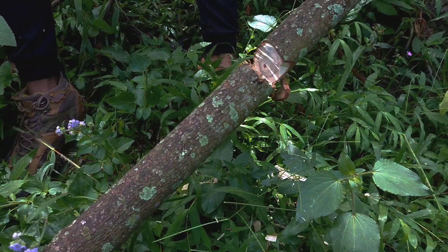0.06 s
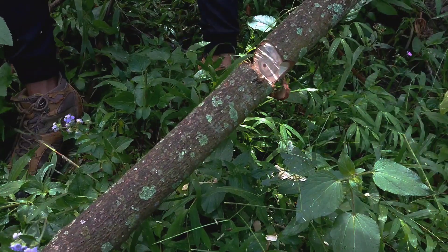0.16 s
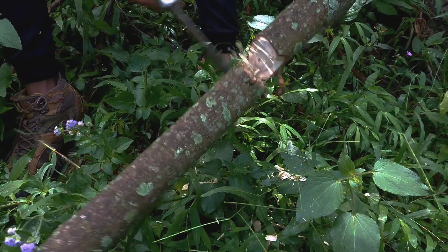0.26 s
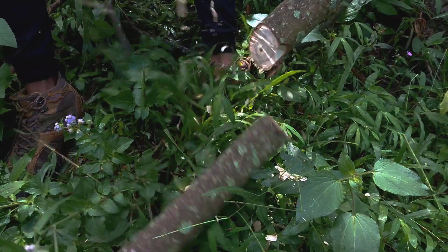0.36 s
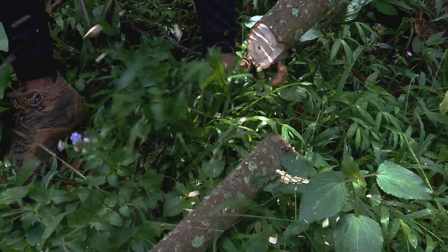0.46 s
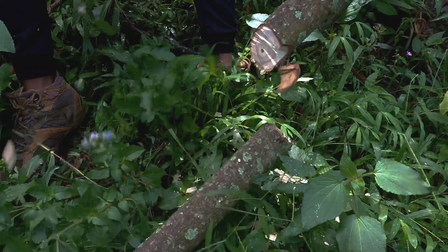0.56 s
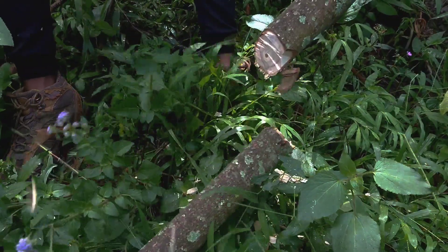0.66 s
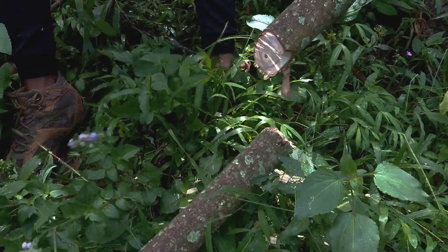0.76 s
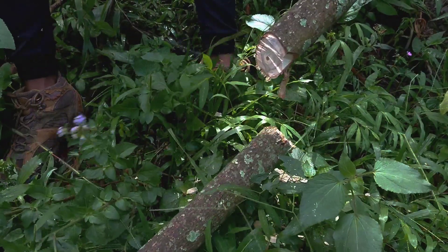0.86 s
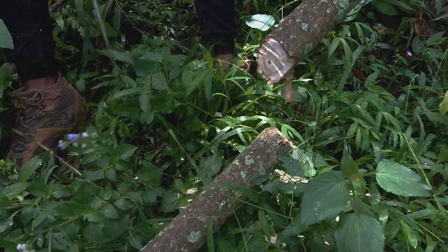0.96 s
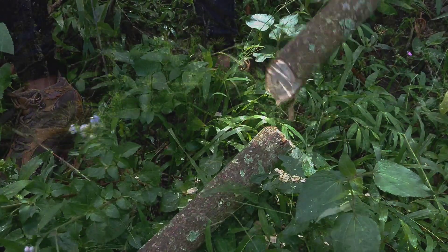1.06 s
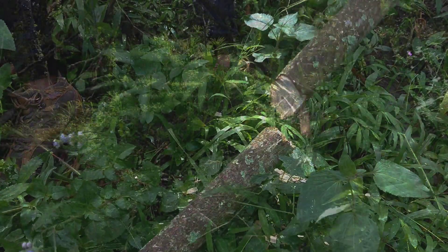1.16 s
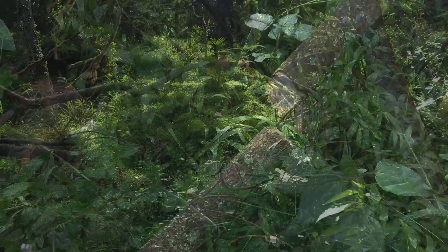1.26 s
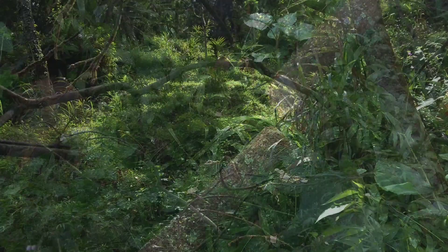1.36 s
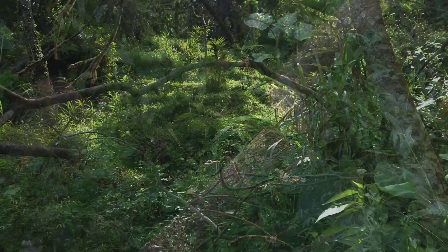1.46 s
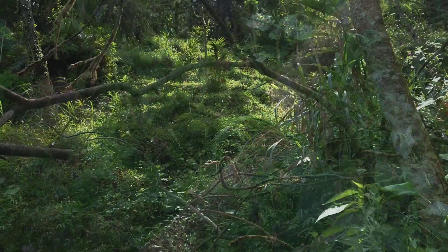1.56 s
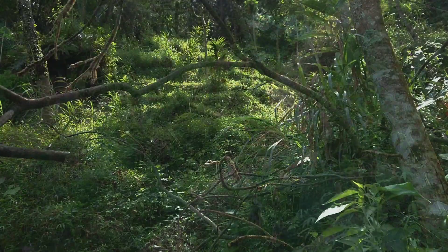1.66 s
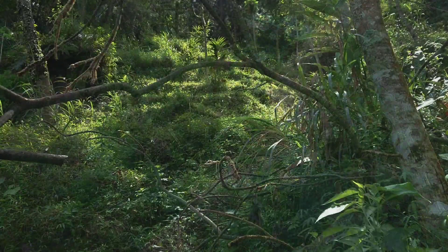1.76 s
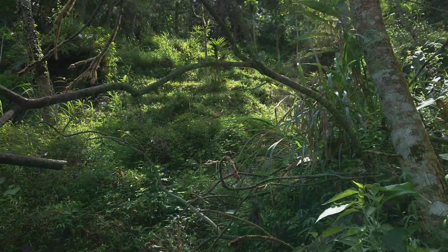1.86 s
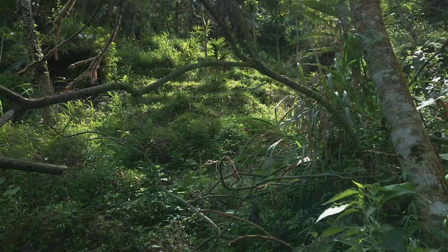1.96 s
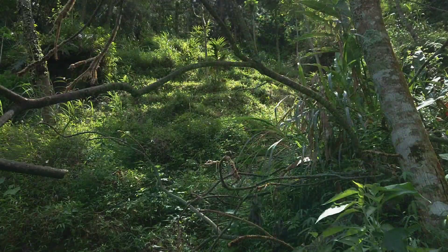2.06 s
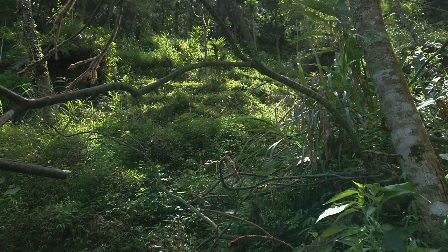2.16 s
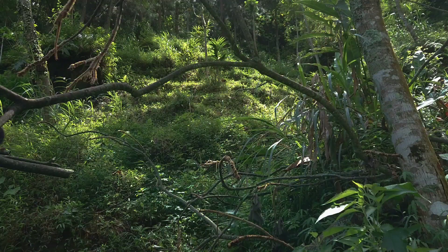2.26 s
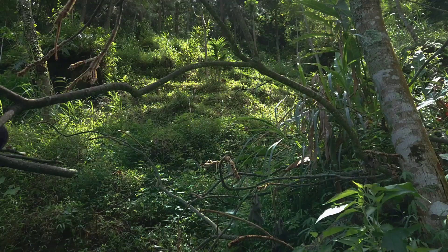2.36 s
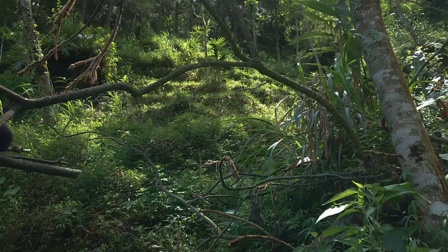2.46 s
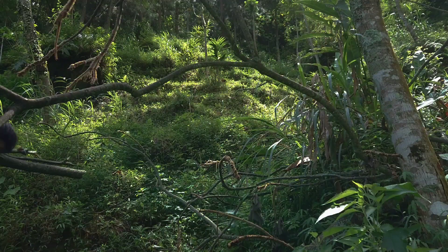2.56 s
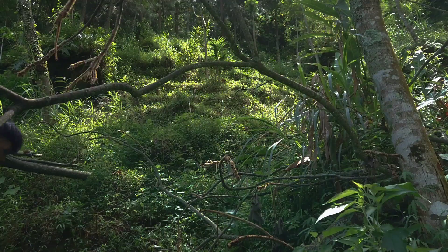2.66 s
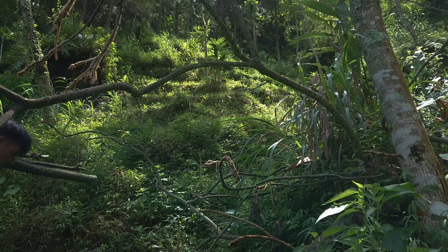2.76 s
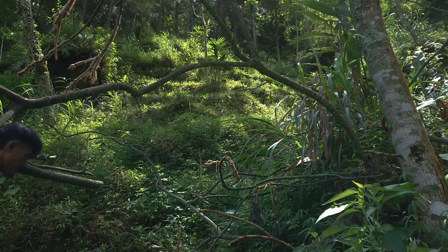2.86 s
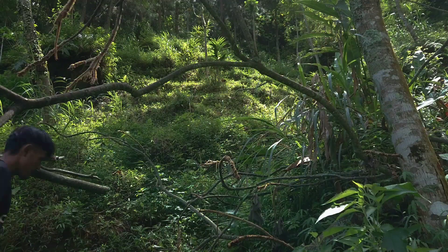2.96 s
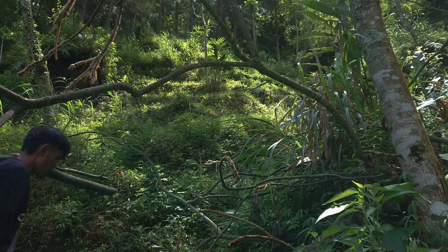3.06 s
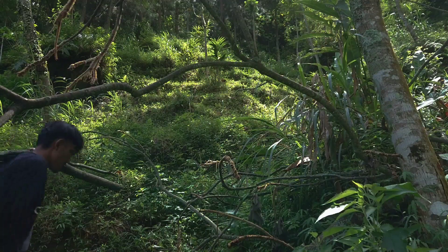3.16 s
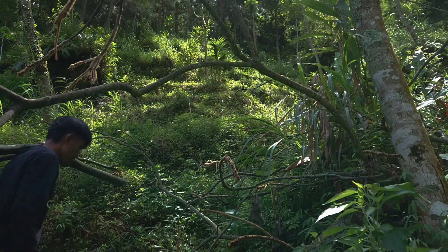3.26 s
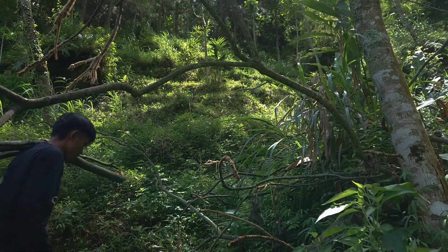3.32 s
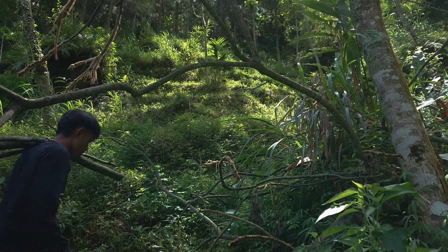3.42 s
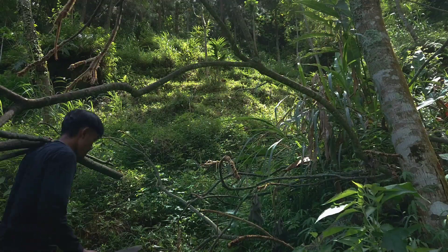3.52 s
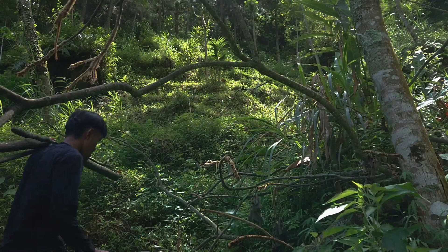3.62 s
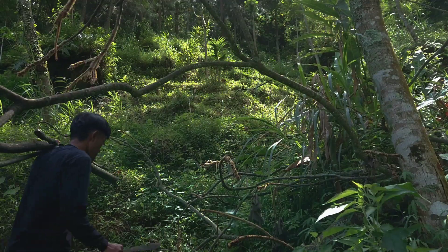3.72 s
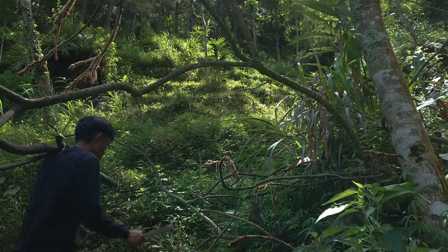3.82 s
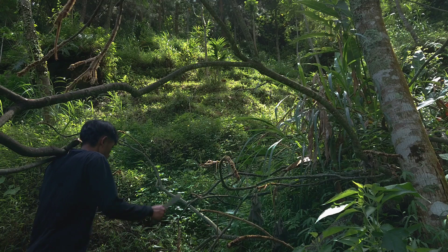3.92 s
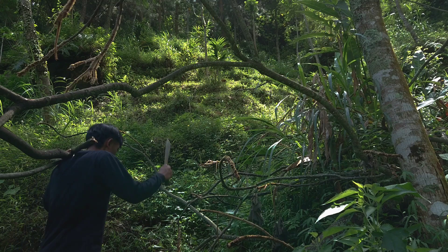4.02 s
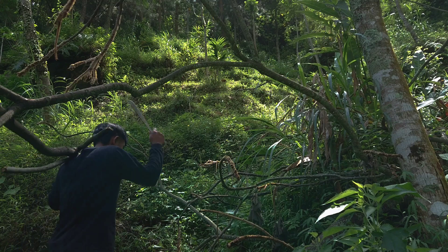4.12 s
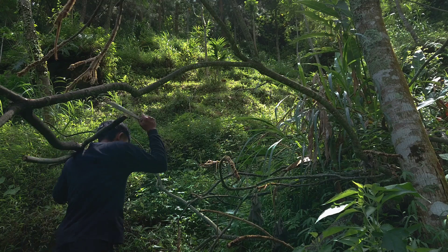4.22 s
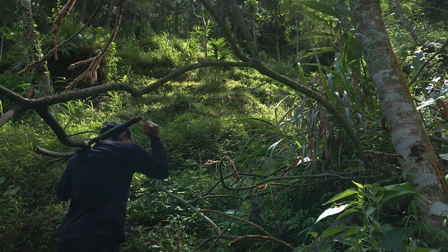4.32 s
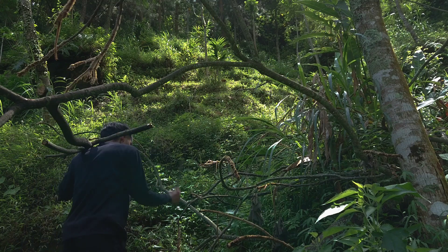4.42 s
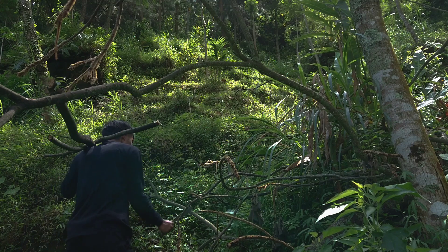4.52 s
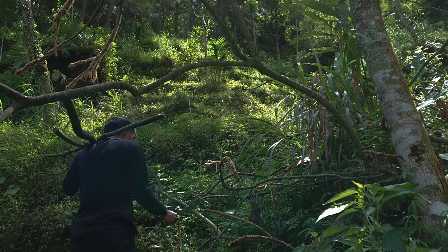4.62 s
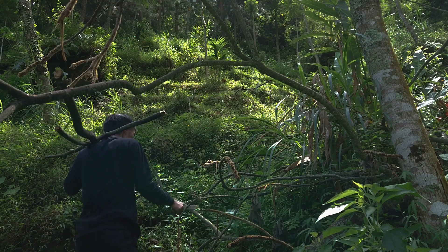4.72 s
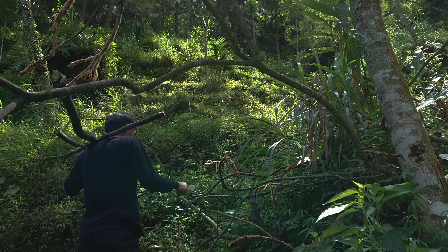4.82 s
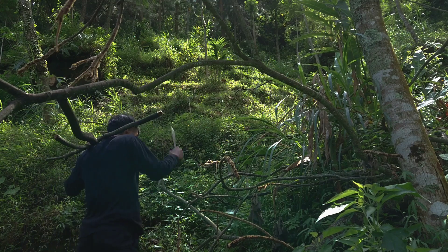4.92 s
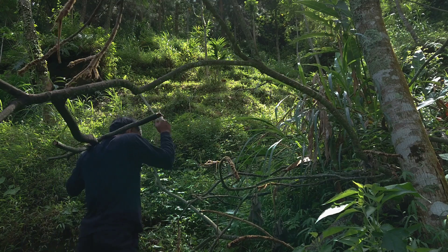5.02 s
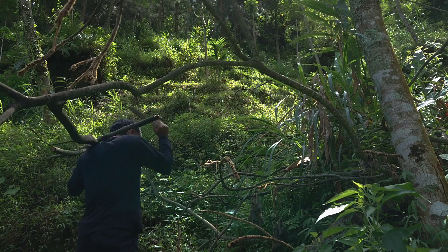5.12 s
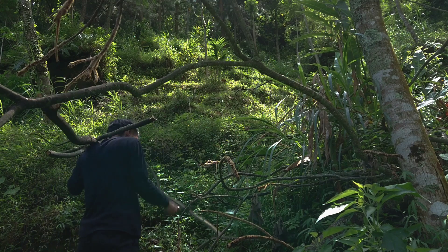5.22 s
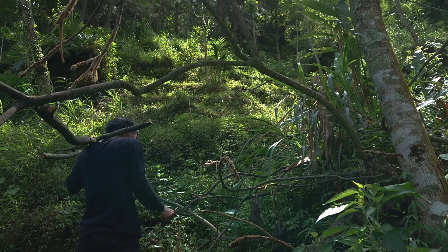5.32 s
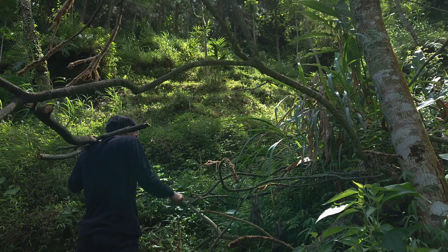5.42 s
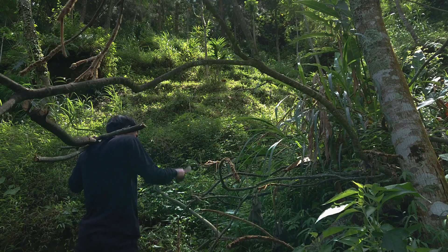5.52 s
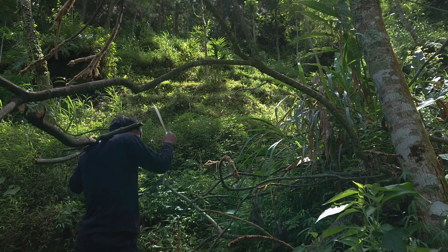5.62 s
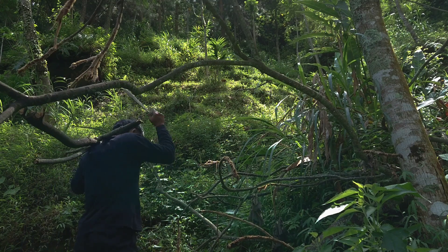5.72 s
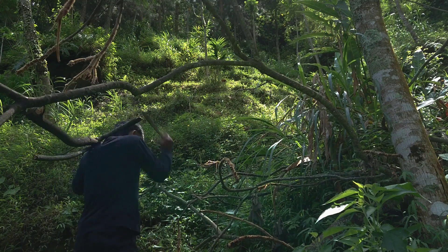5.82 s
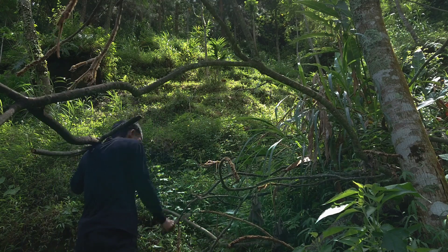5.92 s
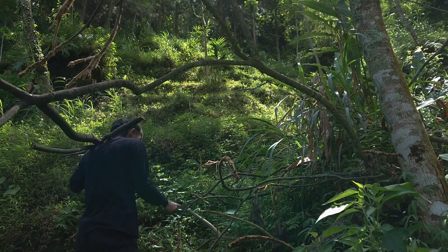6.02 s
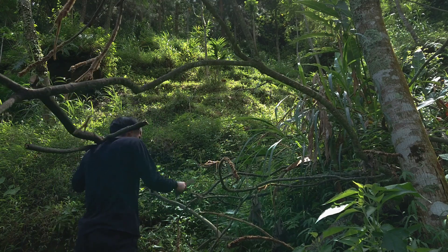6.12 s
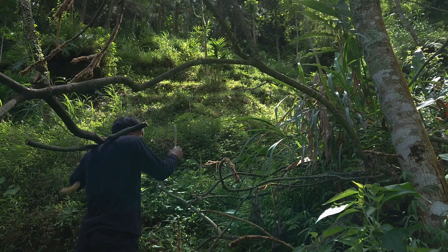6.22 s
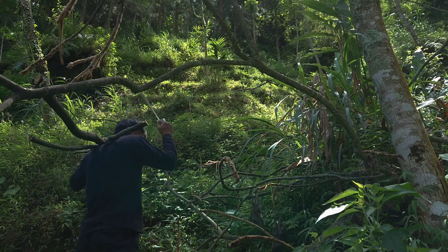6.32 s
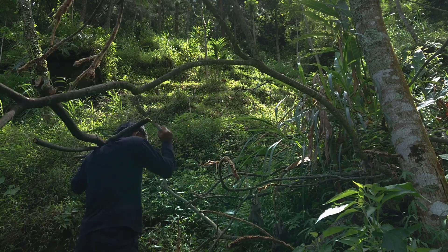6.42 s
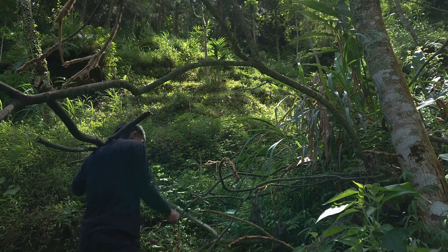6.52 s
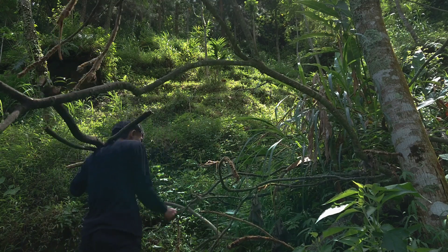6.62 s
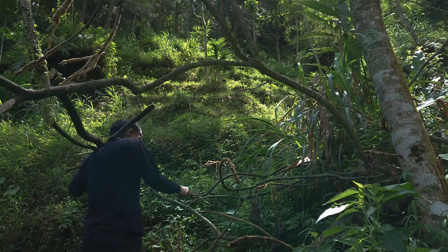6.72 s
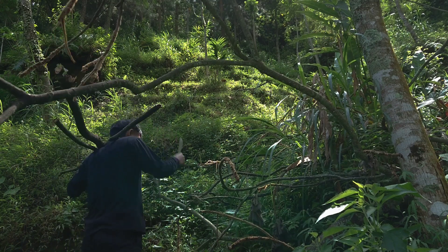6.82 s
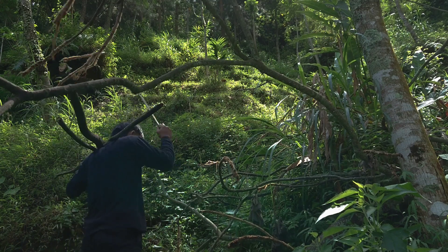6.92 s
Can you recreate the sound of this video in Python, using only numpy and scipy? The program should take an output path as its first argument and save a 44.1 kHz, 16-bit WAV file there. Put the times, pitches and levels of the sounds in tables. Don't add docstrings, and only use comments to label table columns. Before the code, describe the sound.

Quiet undergrowth with soft low rumble and thin hiss. From 0.1 s a very faint, distant rooster calls in four notes, the last long and falling, ending about 1.2 s. At 0.4 s a blade hits a green trunk very close: a loud, sharp, splintering crack, short wood ring, leaves swishing and settling. Small twig ticks come near 0.9 and 1.05 s, and a tiny falling bird chirp at 1.47 s. The air sinks and at 1.7 s a second forest enters, rising until 2.5 s: bright continuous cicadas, slightly left, sagging briefly every second or so, with a low receding engine hum and rumble. Soft brushing and a dull step occur around 3.4 s, another brush at 3.9 s. Four chops into a branch, farther and quieter, fall at 4.6, 5.4, 6.1 and 6.7 s, each a dry crack, hollow knock, low thump and leaf rustle; the rumble swells at the last.

```python
import sys
import numpy as np
from scipy import signal
from scipy.io import wavfile
from scipy.ndimage import uniform_filter1d

SR = 44100
rng = np.random.default_rng(int(sys.argv[2]) if len(sys.argv) > 2 else 0)


def pcm_store(signal):
    levels = np.round(np.clip(np.atleast_2d(signal), -1, 1) * 32767)
    wavfile.write(sys.argv[1], SR, levels.astype(np.int16).T)


def undo_db(level):
    steps = np.asarray(level, float) / 20
    return 10 ** steps


N = 307818


def evened(x):
    return x / np.sqrt(np.mean(x ** 2) + 1e-20)


def read(points, hz):
    f, value = np.transpose(points)
    return np.interp(np.log(hz + 1), np.log(f + 1), value)


def curve(rows, column=1):
    rows = np.array(rows)
    return np.interp(np.arange(N) / SR, rows[:, 0], rows[:, column])


def add(mix, s, sound):
    part = mix[:, round(s * SR):][:, :sound.shape[1]]
    part += sound[:, :part.shape[1]]


def ring(x, hz, width_hz):
    r = np.exp(-np.pi * width_hz / SR)
    w = 2 * np.pi * min(hz, SR / 2.2) / SR
    return signal.lfilter([np.sin(w)], [1, -2 * r * np.cos(w), r * r], x)


def glide(x, hz, width_hz):
    turn = np.exp(2j * np.pi * np.cumsum(hz) / SR)
    r = np.exp(-np.pi * width_hz / SR)
    return evened((turn * signal.lfilter([1], [1, -2 * r, r * r], x / turn)).real)


def pair(count, same):
    a, b = rng.standard_normal((count, 2)).T
    same = np.clip(same, 0, 1)
    return np.array([a, same * a + np.sqrt(1 - same ** 2) * b])


def bed(spectrum, likeness, patchy_db, flicker_db, left_lead=0, left_db=0):
    frames, hz = N // 256 + 5, np.fft.rfftfreq(1024, 1 / SR)
    a, b, c, d, patches = rng.standard_normal((frames, 513, 5)).T
    patches = uniform_filter1d(patches, size=8, axis=0)
    patches = evened(uniform_filter1d(patches, size=10, axis=1))
    flicker = evened(uniform_filter1d(rng.standard_normal(frames), size=3))
    same = np.clip(read(likeness, hz), 0, 1)[:, None]
    left, other = a + 1j * b, c + 1j * d
    late = np.exp(-2j * np.pi * hz * left_lead / SR)[:, None]
    z = np.array([left * undo_db(left_db), same * left * late + np.sqrt(1 - same ** 2) * other])
    colour_db = np.where(hz > spectrum[-1][0], -120, read(spectrum, hz))
    z *= undo_db(colour_db[:, None] + patchy_db * patches + flicker_db * flicker)
    return evened(signal.istft(z, nperseg=1024, noverlap=768)[1][:, :N])


# frequency in Hz, likeness 0-1.
DIFFUSE = [(60, .95), (200, 0.93), (380, .75), (700, 0.053), (1300, 0.033), (16000, .03)]
# frequency in Hz, level in dB per Hz.
NEAR_AIR = [(15, -57), (25, -30), (53, -3.5), (130, -4.5), (166, -11.5), (256, -14), (607, -23.5),
            (677, -22), (734, -23.5), (1370, -28.5), (1520, -32.5), (5000, -35), (7310, -47),
            (16000, -39.5)]
NEAR_RUMBLE_DB, NEAR_HISS_DB = -55.5, -62.5
FAR_START_S = 1.699
FADE_OUT_S, FADE_OUT_LEFT = 0.93, 0.37
DUCK_S, DUCK_DB, DUCK_WIDTH_S = .56, -3, 0.078


def first_scene():
    t = np.arange(N) / SR
    low = [p for p in NEAR_AIR if p[0] < 450] + [(600, -22.5)]
    high = [(250, -41.5)] + [p for p in NEAR_AIR if p[0] >= 450]
    rumble = undo_db(NEAR_RUMBLE_DB) * bed(low, DIFFUSE, patchy_db=1.5, flicker_db=-1.8, left_db=1.4)
    hiss = undo_db(NEAR_HISS_DB) * bed(high, DIFFUSE, patchy_db=1.3, flicker_db=1.4, left_db=0.5)
    fade = curve([(FADE_OUT_S, 1), (FAR_START_S, FADE_OUT_LEFT)])
    duck = undo_db(DUCK_DB * np.exp(-((t - DUCK_S) / DUCK_WIDTH_S) ** 2))
    return (rumble + hiss) * fade * duck * (np.arange(N) < FAR_START_S * SR)


# start in seconds, length in seconds, pitch in Hz, end pitch in Hz,
# 2nd partial in dB.
ROOSTER = [
    (0.098, .11, 684, 690, -73.5),
    (.22, 0.21, 690, 686, -69),
    (0.622, 0.21, 701, 687, -74.5),
    (0.852, .36, 688, 622, -68),
]
CROW_EDGE_S, CROW_FADE_DB, CROW_LOW_DB = 0.017, -16.5, -1


def rooster():
    out = np.zeros((2, N))
    for s, length_s, hz, end_hz, db in ROOSTER:
        t = np.arange(0, length_s, 1 / SR)
        turns = np.cumsum(hz + (end_hz - hz) * (t / length_s) ** 2) / SR
        edges = np.clip(np.minimum(t, length_s - t) / CROW_EDGE_S, 0, 1)
        level = edges * undo_db(db + CROW_FADE_DB * (hz - end_hz) / 100 * t / length_s)
        voice = np.sin(4 * np.pi * turns) + undo_db(CROW_LOW_DB) * np.sin(2 * np.pi * turns)
        add(out, s, level * voice * np.ones((2, 1)))
    return np.sqrt(2) * out


# start in seconds, crack in dB, wood ring in dB, ground thump in dB, crack decay factor.
CHOPS = [
    (0.3983, -6.5, -25, -57, 0.71),
    (4.6242, -20, -18, -40.5, 0.66),
    (5.4029, -18, -25.5, -40.5, 0.85),
    (6.076, -18.5, -27.5, -42.5, 1.03),
    (6.699, -20, -24.5, -41, 0.82),
]
# frequency in Hz, level in dB per Hz.
CRACK_1 = [(180, -33), (300, -23.5), (1170, -4), (3290, -2.5), (7320, -15), (8500, -20.5), (9090, -21),
           (12100, -11.5), (14700, -18.5), (16000, -36.5)]
CRACK_2 = [(180, -36), (400, -7), (1560, 8), (2360, 9.5), (4990, -7), (5900, -5), (7690, -19),
           (11500, -13.5), (15000, -20), (16000, -54.5)]
CRACK_3 = [(180, -39), (300, -7.5), (994, -15), (2140, 6.5), (3080, -17), (3580, -1.5), (6000, -12.5),
           (7440, -28.5), (10700, -14.5), (16000, -38)]
CRACK_4 = [(180, -19), (300, -10.5), (978, -2), (1930, -0.5), (4300, -9.5), (5340, -13), (6000, -4),
           (7820, -18.5), (11700, -12), (16000, -39.5)]
CRACK_5 = [(180, -46), (400, -15), (1450, 0.5), (2000, -1), (3760, -9.5), (4830, -8), (6410, -21),
           (7200, -31), (11500, -16.5), (16000, -43)]
# frequency in Hz, T60 in seconds.
CRACK_T60 = [(300, 0.27), (1000, 0.041), (2500, 0.027), (6000, 0.033), (15000, 0.034)]
# frequency in Hz, level in dB, T60 in seconds.
WOOD_1 = [(165, -2.5, 0.11), (446.3, 0.5, 0.14), (730, 0.5, 0.086), (1265, -1, 0.04), (1850, -6, .035),
          (2010, -6.5, 0.03)]
WOOD_2 = [(344, -7, 0.16), (446, -17.5, 0.18), (537, -3, 0.09), (776, -5.5, 0.17), (937, -3, 0.088),
          (1406, -4, 0.072)]
WOOD_3 = [(355.3, -0.5, 0.21), (464, 2, 0.084), (620, -2.5, 0.048), (786, -5, 0.27), (947, -0.5, 0.088),
          (1400, 1.5, 0.031)]
WOOD_4 = [(350, 1, 0.16), (630, -16, 0.14), (805, 6.5, 0.15), (970, 3, 0.069), (1110, -28, 0.059),
          (1850, -17, .05)]
WOOD_5 = [(330, -7, 0.05), (512, -8.5, 0.2), (798, 4.5, 0.1), (956, 1.5, 0.077), (1183, 6.5, 0.027),
          (1470, 8.5, 0.036)]
CRACKS = (CRACK_1, CRACK_2, CRACK_3, CRACK_4, CRACK_5)
WOODS = (WOOD_1, WOOD_2, WOOD_3, WOOD_4, WOOD_5)
NEAR_LEAD_SAMPLES, FAR_LEAD_SAMPLES = 0, 7
NEAR_SAME, FAR_SAME = .15, .55
CRACK_HOLD_S, CRACK_RISE_S = .0016, .0011
BITE_S = .0019
LIMB_HZ, LIMB_DB, LIMB_RISE_S = 154.5, 0, 0.012


def fibre_crack(t, same, colour, crack_db, slow):
    spikes = undo_db(2.4 * np.minimum(rng.exponential(1, len(t)), 4))
    splinters = spikes * pair(count=len(t), same=same)
    hz, frame_t, z = signal.stft(splinters, SR, nperseg=128, noverlap=112)
    t60 = slow * read(CRACK_T60, hz)[:, None]
    z *= undo_db(read(colour, hz)[:, None] - 60 * np.maximum(frame_t - CRACK_HOLD_S, 0) / t60)
    crack = signal.istft(z, SR, nperseg=128, noverlap=112)[1][:, :len(t)]
    crack = crack * np.clip(t / CRACK_RISE_S, 0, 1) ** 2
    return crack * undo_db(crack_db) / np.sqrt(np.mean(crack[:, :250] ** 2))


def wood_ring(t, same, modes, right_lead):
    push = t ** 2 * np.exp(-t / BITE_S)
    wood = np.zeros((2, len(t)))
    for hz, db, t60 in modes:
        tone = ring(pair(count=len(t), same=same + .35) * push, hz, 3.1 / t60)
        wood += undo_db(db) * tone / abs(tone).max()
    wood[0] = np.interp(np.arange(len(t)) - right_lead, np.arange(len(t)), wood[0])
    return wood


def ground_thump(t):
    late = np.maximum(t - .012, 0)
    thump_hz = 62 + 110 * np.exp(-late / 0.0041)
    thump = np.sin(2 * np.pi * np.cumsum(thump_hz) / SR) * late / 0.033 * np.exp(1 - late / 0.03)
    swell = t / LIMB_RISE_S * np.exp(1 - t / LIMB_RISE_S)
    return thump + undo_db(LIMB_DB) * np.sin(2 * np.pi * LIMB_HZ * t) * swell


def chop(row, colour, modes):
    s, crack_db, ring_db, thump_db, slow = row
    near = s < FAR_START_S
    right_lead, same = (NEAR_LEAD_SAMPLES, NEAR_SAME) if near else (FAR_LEAD_SAMPLES, FAR_SAME)
    t = np.arange(8000) / SR
    crack = fibre_crack(t, same, colour, crack_db, slow)
    wood = undo_db(ring_db) * wood_ring(t, same, modes, right_lead)
    return s, crack + wood + undo_db(thump_db) * ground_thump(t)


# start in seconds,
# level in dB, frequency in Hz, width in Hz, length in seconds.
SNAPS = [(0.402, -59, 3190, 2970, .002), (0.4073, -11, 4435, 1512, 0.0022), (.4052, -27, 11500, 5000, .003),
         (0.415, -61, 4440, 3060, 0.0024), (0.49, -69, 900, 900, 0.027), (0.925, -59, 3200, 2520, 0.0041),
         (1.048, -61, 12000, 5000, .002), (4.654, -41, 1800, 1500, 0.0025), (5.42, -33, 2500, 2500, 0.0029),
         (5.43, -39.5, 700, 700, 0.02), (6.08, -55, 2000, 2000, 0.0067), (6.716, -34, 11760, 3000, 0.0017),
         (6.752, -41.5, 846, 300, 0.027), (6.787, -43.5, 4300, 2500, 0.0042),
         (0.401, -27.5, 650, 248, 0.0069), (0.398, -17.5, 1278, 350, 0.004)]


def snap(s, db, hz, width_hz, length_s):
    t = np.arange(4000) / SR
    burst = pair(count=len(t), same=0.56) * np.sin(np.pi * np.clip(t / length_s, 0, 1))
    tone = ring(ring(burst, hz, width_hz), hz, width_hz)
    return s, undo_db(db) * tone / np.sqrt(np.sum(tone ** 2) / (2 * length_s * SR))


def blade():
    out = np.zeros((2, N))
    for row, colour, modes in zip(CHOPS, CRACKS, WOODS):
        add(out, *chop(row, colour, modes))
    for row in SNAPS:
        add(out, *snap(*row))
    return out


def trees(x):
    t = np.arange(12000) / SR
    tail = pair(count=len(t), same=.1) * undo_db(-60 * t / 0.33) * np.clip(t / 0.0052, 0, 1)
    tail = signal.lfilter([1], [1, -.7], tail)
    return signal.fftconvolve(x, tail / np.linalg.norm(tail[0]), axes=1)[:, :N]


# start in seconds, first lash in dB, swish in dB, swish hold in seconds,
# swish release in seconds.
RUSTLE = [
    (.415, -40.5, -50, 0.071, 0.126),
    (.47, -63, -55, 0.041, 0.12),
    (2.24, -64, -61.5, .03, .03),
    (3.367, -72, -59.5, 0.084, .04),
    (3.92, -72, -59, .04, .03),
    (4.633, -38, -56.5, 0.15, .04),
    (5.409, -33.5, -55.5, 0.086, 0.086),
    (6.081, -29.5, -51, 0.12, 0.033),
    (6.708, -38.5, -52.5, 0.077, 0.064),
]
# frequency in Hz, level in dB per Hz.
LEAVES = [(180, -26.5), (300, -5), (574, -10.5), (656, -9.5), (801, -3.5), (1040, -9), (4230, -9),
          (7320, -18.5), (9550, -15.5), (15200, -15), (15900, -32.5)]
LASH_DB_PER_S, LEAF_RISE_S, SETTLE_POWER, GRAIN_DB = 699, 0.022, 1.6, 1.8


def leaves():
    level = np.zeros(N)
    for s, lash_db, swish_db, hold_s, release_s in RUSTLE:
        t = np.maximum(np.arange(N) / SR - s, 0)
        lash = undo_db(lash_db - LASH_DB_PER_S * t)
        swish = undo_db(swish_db) / (1 + np.maximum(t - hold_s, 0) / release_s) ** SETTLE_POWER
        level += np.minimum(t / LEAF_RISE_S, 1) * (lash + swish)
    grains = evened(uniform_filter1d(rng.standard_normal(N), size=60))
    contacts = undo_db(GRAIN_DB * grains) * bed(LEAVES, DIFFUSE, patchy_db=0.0, flicker_db=0.15)
    return level * evened(contacts)


# start in seconds, length in seconds, start pitch in Hz, end pitch in Hz, level in dB.
CHIRP = [
    (1.463, .013, 5340, 5160, -72),
    (1.474, 0.021, 4940, 4440, -69.5),
]


def chirp():
    out = np.zeros((2, N))
    for s, length_s, hz, end_hz, db in CHIRP:
        u = np.arange(0, length_s, 1 / SR) / length_s
        turns = np.cumsum(hz + (end_hz - hz) * u) / SR
        add(out, s, undo_db(db) * np.sin(np.pi * u) * np.sin(2 * np.pi * turns) * np.ones((2, 1)))
    return np.sqrt(2) * out


# frequency in Hz, level in dB per Hz.
CHORUS = [(880, -15), (1500, -17), (1680, -25), (2180, -16.5), (2860, -6), (3100, -10), (3500, -7),
          (3960, -4.5), (4240, -8), (4600, -6.5), (5990, -6.5), (6910, -15.5), (7600, -22), (9880, -53),
          (16700, -120)]
TREBLE = [(4350, -40), (7400, -47), (7570, -18), (8230, -1.5), (9890, 4.5), (15100, -5.5), (15500, -18),
          (15900, -40), (16400, -53)]
# frequency in Hz, likeness 0-1.
DIRECT = [(1500, 1), (2600, 0.14), (3600, 0.59), (4700, 0.26), (6000, 0.7), (8000, 0.25), (11000, 0.26),
          (16000, .2)]
# time in seconds, treble loss in dB, recovery in seconds.
PHRASE_ENDS = [
    (1.95, 5, 0.43),
    (2.86, 3, .4),
    (3.64, 5, 0.46),
    (4.444, 6, .35),
    (5.23, 6, 0.58),
    (6.162, 7, 0.4),
]
CHORUS_DB, TREBLE_DB, SLACKEN_S = -55.5, -61, 0.089
RIDGE_HZ, RIDGE_WIDTH_HZ, RIDGE_DB = 4530, 94, -68
SONG_HZ, SONG_SAG_HZ_PER_DB, SONG_WIDTH_HZ, SONG_DB = 4750, 140, 750, -64.5


def cicadas():
    slack_db = np.zeros(N)
    for s, db, back_s in PHRASE_ENDS:
        slack_db += curve([(s, 0), (s + SLACKEN_S, db), (s + SLACKEN_S + back_s, 0)])
    chorus = bed(CHORUS, DIRECT, patchy_db=0.3, flicker_db=0.2, left_lead=18.13, left_db=1.5)
    treble = bed(TREBLE, DIRECT, patchy_db=0.5, flicker_db=1.5, left_lead=16.9, left_db=1.7)
    song = glide(chorus, SONG_HZ - SONG_SAG_HZ_PER_DB * slack_db, SONG_WIDTH_HZ)
    ridge = evened(ring(chorus, RIDGE_HZ, RIDGE_WIDTH_HZ))
    low_band = undo_db(CHORUS_DB) * chorus + undo_db(RIDGE_DB) * ridge
    return low_band + undo_db(TREBLE_DB - slack_db) * treble + undo_db(SONG_DB) * song


# time in seconds, firing rate in Hz, level in dB.
ENGINE = [(1.7, 147.1, -52), (2.35, 142.8, -48), (2.9, 144.6, -54.5), (3.4, 143, -53), (3.6, 142, -60),
          (4.1, 140, -54), (4.6, 139.5, -58), (5.6, 134.8, -60.5), (6.0, 145.5, -62), (6.98, 147.6, -59.5)]
# multiple of the firing rate, level in dB.
ENGINE_ORDERS = [(.75, -15), (1, -1), (1.25, -11.5), (1.5, -22.5), (2, -22.5), (3, -22)]
WAVER_DB = 1.3


def engine():
    turns = np.cumsum(curve(ENGINE)) / SR
    noise = rng.standard_normal((N, len(ENGINE_ORDERS)))
    waver = evened(uniform_filter1d(noise, size=2500, axis=0)).T
    hum = np.zeros(N)
    for (k, db), w in zip(ENGINE_ORDERS, waver):
        hum += undo_db(db + WAVER_DB * w) * np.sin(2 * np.pi * k * turns + 0.34 * w[::-1])
    balance = undo_db(np.array([[.7], [-.7]]))
    return np.sqrt(2) * undo_db(curve(ENGINE, column=2)) * hum * balance


# frequency in Hz, level in dB per Hz.
FAR_RUMBLE = [(15, -50), (32, -47), (55, 8.5), (140, -5), (218, -14.5), (297, -8.5), (363, -14),
              (771, -14.5), (1010, -21), (1180, -18.5), (1630, -27), (2000, -27.5), (2600, -53),
              (4400, -120)]
# time in seconds, swell in dB, width in seconds.
RUMBLE_SWELLS = [
    (2.451, 0.5, 0.12),
    (3.4, 4, 0.076),
    (4.8, 2.5, .1),
    (6.5, -1, .12),
    (6.76, 8.5, 0.066),
]
FAR_RUMBLE_DB = -53.5


def swelling_rumble():
    t = np.arange(N) / SR
    swells_db = sum(db * np.exp(-((t - s) / width_s) ** 2) for s, db, width_s in RUMBLE_SWELLS)
    rumble = bed(FAR_RUMBLE, DIFFUSE, patchy_db=1.0, flicker_db=0.03, left_db=2.5)
    return undo_db(FAR_RUMBLE_DB + swells_db) * rumble


FADE_IN_S, FADE_IN_FROM = 0.81, 0.43


def second_scene():
    fade = curve([(FAR_START_S, FADE_IN_FROM), (FAR_START_S + FADE_IN_S, 1)])
    return (cicadas() + engine() + swelling_rumble()) * fade * (np.arange(N) / SR >= FAR_START_S)


def scene():
    blows = blade()
    near_sounds = blows + undo_db(-44.5) * trees(blows) + leaves()
    return near_sounds + rooster() + chirp() + first_scene() + second_scene()


def band_limit(x):
    return signal.sosfilt(signal.butter(12, 16730, fs=SR, output="sos"), x)


LOW_CUT_HZ, NOTCH_HZ, NOTCH_Q, NOTCH_SHARE = 42, 7390, 15, 0.98
LIMIT, EDGE_HZ = .85, 16400


def record(dry):
    cut = signal.lfilter(*signal.butter(3, LOW_CUT_HZ, "high", fs=SR), dry)
    notched = signal.lfilter(*signal.iirnotch(NOTCH_HZ, NOTCH_Q, SR), cut)
    cut = (1 - NOTCH_SHARE) * cut + NOTCH_SHARE * notched
    limited = LIMIT * np.tanh(cut / LIMIT)
    edge = signal.firwin(255, EDGE_HZ, window=("kaiser", 9), fs=SR)[None]
    return band_limit(signal.oaconvolve(limited, edge, "same"))


dry = scene()
out = record(dry)
pcm_store(out)
```